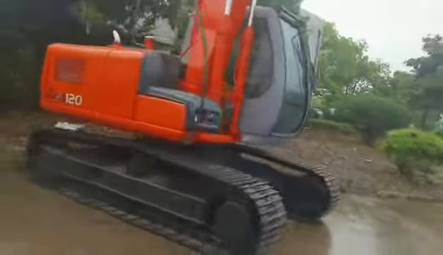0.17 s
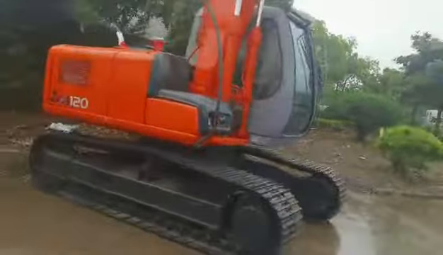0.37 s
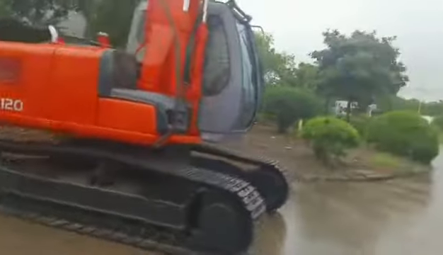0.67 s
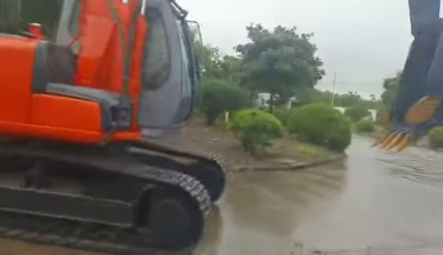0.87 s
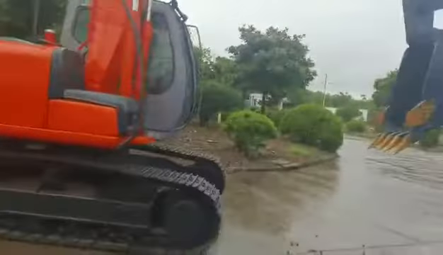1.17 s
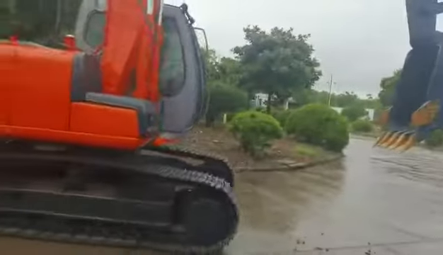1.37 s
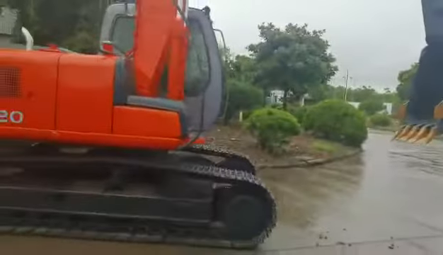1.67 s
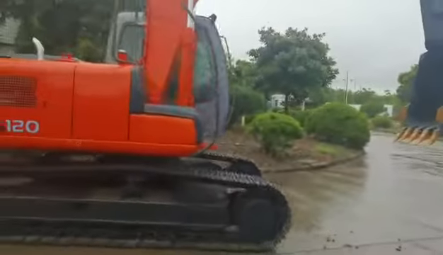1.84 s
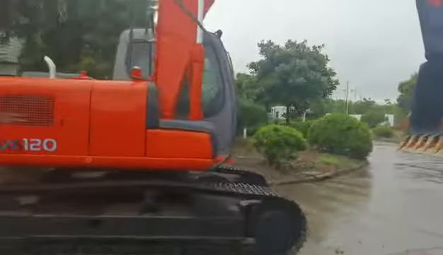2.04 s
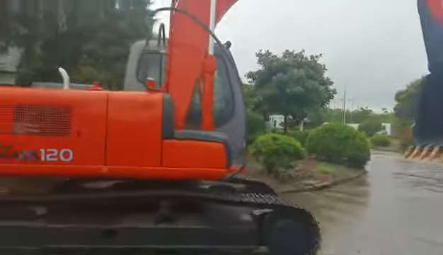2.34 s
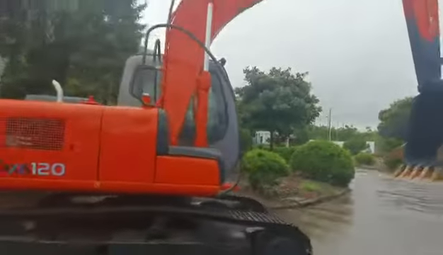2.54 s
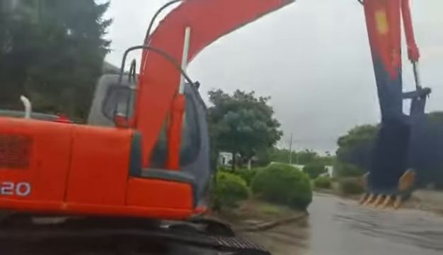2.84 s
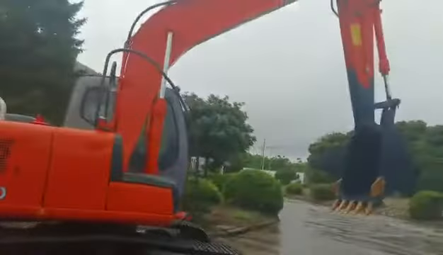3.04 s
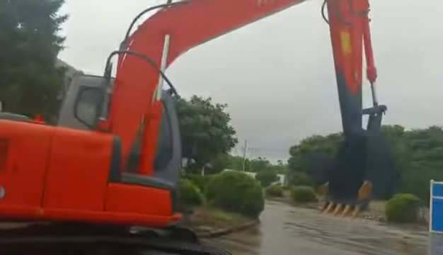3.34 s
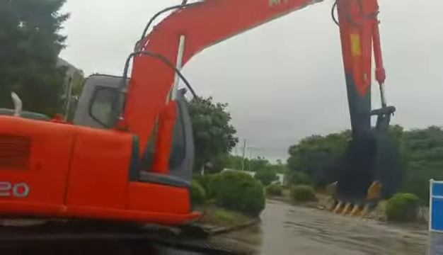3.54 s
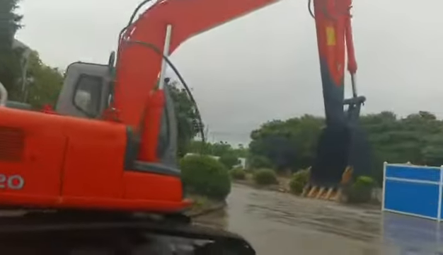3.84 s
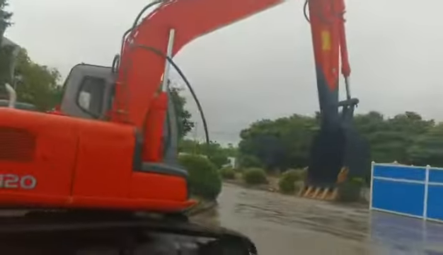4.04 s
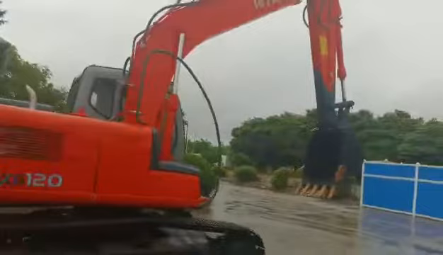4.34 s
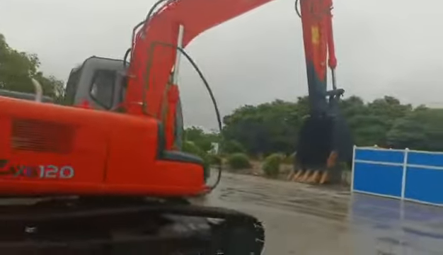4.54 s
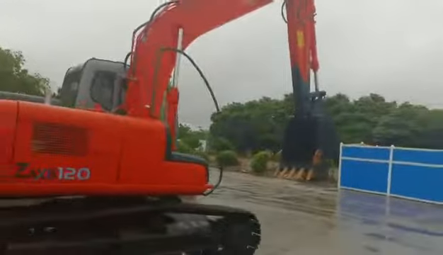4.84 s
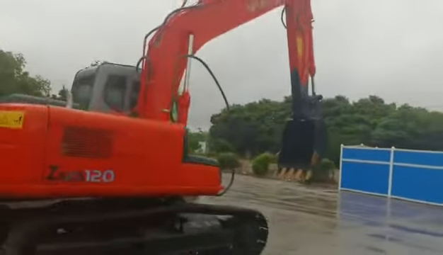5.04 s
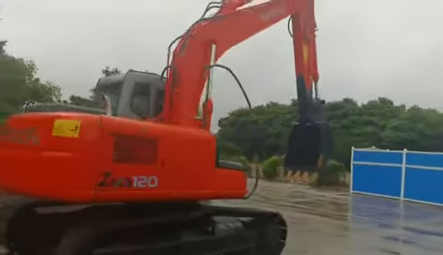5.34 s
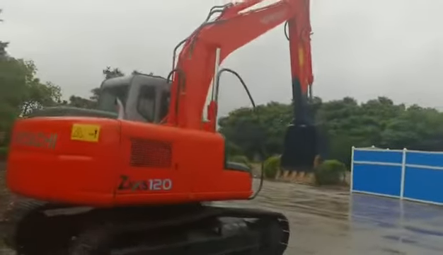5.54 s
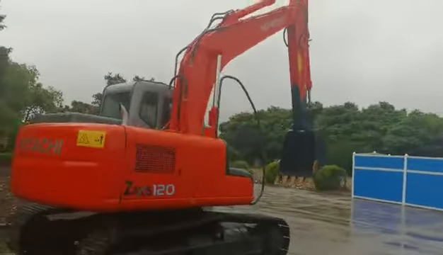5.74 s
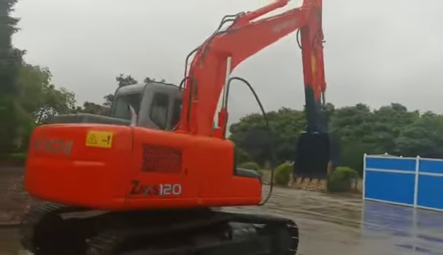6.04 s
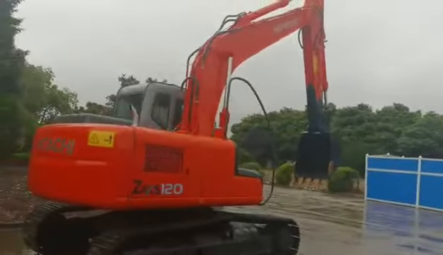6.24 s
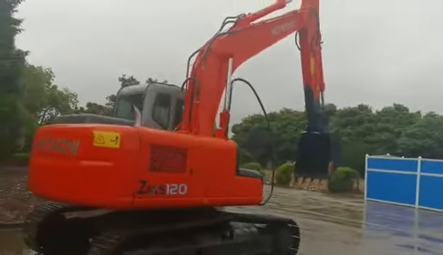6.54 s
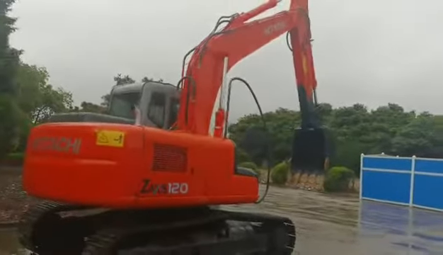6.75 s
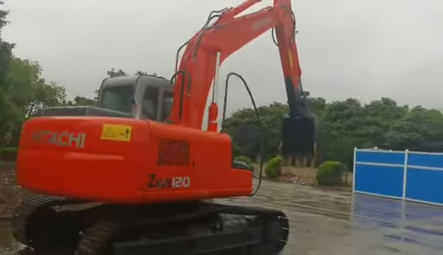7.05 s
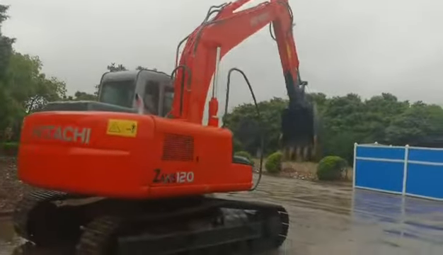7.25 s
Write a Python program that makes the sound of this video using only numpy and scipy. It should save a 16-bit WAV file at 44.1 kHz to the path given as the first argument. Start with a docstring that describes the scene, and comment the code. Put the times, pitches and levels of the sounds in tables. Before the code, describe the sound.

Heavy track shoes thump and rattle past a rumbling engine while feet slap through puddles; the clanking ends and a faint hydraulic whine rises.

```python
"""A tracked excavator crawls across a wet yard and stops: unsteady exhaust tones over shaped noise.
Decaying tones and resonant noise make its track shoes clank; hydraulics hum and whine, then oil rushes.
Crackling noise makes light rain and, near the microphone, the spray after feet slap through thin puddles.
Rain and spray are brightest between about 8 and 9 kHz; the level of the far sound dips briefly at set moments."""
import sys
import numpy as np
from scipy import signal
from scipy.fft import rfft, irfft, next_fast_len
from scipy.io import wavfile
from scipy.ndimage import uniform_filter1d, map_coordinates

SR = 44100
rng = np.random.default_rng(int(sys.argv[2]) if len(sys.argv) > 2 else 0)


def unload_wav(signal):
    """Save mono or channel-first audio to the path in sys.argv[1] as 16-bit WAV at rate SR, clipped to [-1, 1]."""
    wavfile.write(
        sys.argv[1],
        SR,
        np.round(np.clip(np.atleast_2d(signal).T, -1, 1) * 32767).astype(np.int16),
    )


N = 326781
TIME = np.arange(N) / SR
STOP_S, LIFT_S = 5.45, 6.3  # the tracks stop; the boom starts to lift


def amp(db):
    """Amplitude factor of a level in dB."""
    return 10 ** (np.asarray(db) / 20)


def unit(x):
    """x scaled to rms 1."""
    return x / np.sqrt(np.mean(x ** 2) + 1e-20)


def along(points, hz):
    """Read (Hz, value) points on a log frequency axis."""
    f, v = np.transpose(points)
    return np.interp(np.log(hz + 1), np.log(f + 1), v)


def curves(rows):
    """One value per sample for each column after the time."""
    s, *cols = np.transpose(rows)
    return [np.interp(TIME, s, c) for c in cols]


def after(s, rise_s):
    """A ramp from 0 at a moment to 1 once the rise is over."""
    return np.clip((TIME - s) / rise_s, 0, 1)


def wobble(rate):
    """A smooth random curve, rate knots a second."""
    return map_coordinates(rng.standard_normal(int(N * rate / SR) + 4), [TIME * rate])


def filtered(x, response):
    """x times a complex response of frequency."""
    m = next_fast_len(N + SR // 2)
    return irfft(rfft(x, m) * response(np.fft.rfftfreq(m, 1 / SR)), m)[..., :N]


def resonances(modes):
    """Causal response of (Hz, width in Hz, dB) resonances, with alternating signs."""
    def response(f):
        return sum((-1) ** k * amp(db) * 1j * f * w / (c * c - f * f + 1j * f * w)
                   for k, (c, w, db) in enumerate(modes))
    return response


def causal(spectrum):
    """Minimum-phase response of a spectrum, so that nothing sounds before a blow."""
    def response(hz):
        cepstrum = irfft(np.log(amp(np.maximum(along(spectrum, hz), -70))))
        half = len(cepstrum) // 2
        cepstrum[1:half] *= 2
        cepstrum[half + 1:] = 0
        return np.exp(rfft(cepstrum))
    return response


# Stereo width of the noises. Each row: pitch [Hz], likeness of left and right [1 = identical].
PORT_LIKENESS = [(60, 0.89), (300, 1), (600, 0.71), (1200, 0.74), (2500, 0.022), (8000, 0.12)]


def rush(spectrum, pair):
    """Two unrelated excitations, coloured and mixed to the likeness of the two ports; rms 1."""
    def mix(hz):
        turn = np.arccos(np.clip(along(PORT_LIKENESS, hz), -1, 1)) / 2
        return amp(along(spectrum, hz)) * [np.cos(turn), np.sin(turn)]
    mid, side = filtered(pair, mix)
    return unit(np.array([mid + side, mid - side]))


def patchy(patchy_db):
    """Two noises with shared streaks of random gain, narrow in pitch and long in time."""
    z = signal.stft(rng.standard_normal((2, N)), nperseg=1024)[2]
    field = uniform_filter1d(rng.standard_normal(z.shape[1:]), size=2, axis=0)
    field = uniform_filter1d(field, size=14, axis=1)
    return signal.istft(z * amp(patchy_db * unit(field)), nperseg=1024)[1][:, :N]


def crackle(rate, spread_db):
    """Two noises whose loudness comes in short random spikes, rate of them a second."""
    sizes = np.minimum(rng.exponential(size=N), 3.5)
    spikes = (rng.random(N) < rate / SR) * amp(spread_db * sizes)
    bursts = signal.lfilter([1], [1, -np.exp(-1 / (0.00061 * SR))], spikes)  # 0.61 ms decay
    return bursts * rng.standard_normal((2, N))


# Exhaust note swelling and easing. Each row: time [s], level [dB].
NOTE_SWELL = [(0.0, -37.5), (1.22, -40), (1.32, -29), (1.67, -40), (2.54, -34), (3.98, -35.5),
              (4.15, -27.5), (4.23, -35), (5.49, -46.5), (5.57, -76), (5.8, -33), (6.67, -44), (6.71, -33),
              (7.0, -34.5), (7.04, -55), (7.41, -36)]
# Colour of the pipe rumble. Each row: pitch [Hz], relative level [dB per Hz].
PIPE_COLOUR = [(25, -69), (38, -43), (70, -14), (82, -32), (101, -4), (177, -23), (200, -21), (260, -64),
               (440, -120)]
# Tones beside the note. Each row: multiple of the firing rate, level against the note [dB].
FIRING_ORDERS = [(1, -20), (3, -15.5), (4, -17.5), (6, -17)]
PIPE_DB, PIPE_WITH_NOTE = -40, 0.17  # pipe rumble; dB it moves per dB of note
NEAR_DB, LEAVE_S, LEAVING_S = 4.5, 0.31, 0.7  # the rumble is fuller while close, then thins out


def exhaust(firing):
    """The pipe sings at twice the firing rate, with weaker firing orders and a noisy rumble."""
    note_db, = curves(NOTE_SWELL)
    note = np.sqrt(2) * amp(note_db) * (1 + 0.33 * wobble(14)) * np.sin(2 * firing)
    steadier_db = uniform_filter1d(note_db, size=SR // 3)
    for multiple, db in FIRING_ORDERS:
        order_db = steadier_db + db + 3.5 * wobble(9.3)
        note += np.sqrt(2) * amp(order_db) * np.sin(multiple * firing)
    pipe_db = PIPE_DB + PIPE_WITH_NOTE * (note_db - note_db.mean())
    pipe_db += NEAR_DB * (1 - after(LEAVE_S, LEAVING_S))
    pipe = amp(pipe_db) * rush(PIPE_COLOUR, rng.standard_normal((2, N)))
    return (note + pipe) * amp([[-.9], [.9]])  # a little to the right


# The machine moving off and stopping. Each row: time [s], block clatter [dB], frame rumble [dB].
MACHINE_LEVELS = [(0.0, -33.5, -25.5), (0.47, -37, -23.5), (0.68, -40, -30.5), (1.46, -36, -28),
                  (1.9, -44, -31.5), (2.23, -46, -36.5), (3.59, -41.5, -32.5), (5.06, -41, -36.5),
                  (5.71, -48, -40), (6.62, -44, -39), (6.97, -42, -35.5), (7.41, -40.5, -40)]
# Colour of the rumbling track frame. Each row: pitch [Hz], relative level [dB per Hz].
TRACK_COLOUR = [(88, -22.5), (150, -9), (270, -5.5), (323, -2.5), (383, -12), (430, -13), (530, -29.5),
                (696, -45), (839, -22.5), (1150, -26.5), (1500, -53), (2530, -120)]
# Colour of the engine block. Each row: pitch [Hz], relative level [dB per Hz].
BLOCK_COLOUR = [(290, -46), (500, 3), (649, -0.5), (1090, -17.5), (1430, -4.5), (1600, -8), (5000, -12.5),
                (6500, -37), (11000, -120)]
# Engine casing resonances. Each row: pitch [Hz], width [Hz], level [dB].
CASING_MODES = [(695, 22, 7), (1030, 70, 7), (1450, 33, -1), (1650, 50, -18), (2280, 380, 2)]
# Upper edge of the rumble, heard only from close by. Each row: pitch [Hz], relative level [dB per Hz].
CLOSE_COLOUR = [(330, -40), (420, 1.5), (490, -1), (560, -51)]
CLOSE_DB, CLOSE_FADES_DB = -29.5, 17  # its level at first, loss per second


def block_and_frame(firing):
    """Noise in block and track frame swells slightly with each firing; a close rumble soon fades."""
    block_db, track_db = curves(MACHINE_LEVELS)
    beat = 1 + 0.043 * np.cos(firing + .5 * wobble(8.2))
    judder_db = wobble(9) + 2.5 * wobble(38)  # short lumps
    judder_db *= 1 - 0.7 * after(STOP_S, SHIFT_S)  # calmer at rest
    tracks = amp(track_db + judder_db) * rush(TRACK_COLOUR, beat * patchy(patchy_db=1.5))
    casing = filtered(beat * patchy(patchy_db=2.3), lambda hz: 1 + np.abs(resonances(CASING_MODES)(hz)))
    block = amp(block_db + 1.48 * wobble(10)) * rush(BLOCK_COLOUR, casing)
    close_db = CLOSE_DB - CLOSE_FADES_DB * TIME + judder_db
    close = amp(close_db) * rush(CLOSE_COLOUR, patchy(patchy_db=2.5))
    return tracks + close + block


LOADED_HZ, FREE_HZ = 94.8, 102.8  # exhaust note under load and running free
SHIFT_S = 0.136  # time for a change of load


def engine():
    """One firing phase drives exhaust, block and frame; it runs faster off load, unsteadier after the stop."""
    free = after(STOP_S, SHIFT_S) - after(LIFT_S - SHIFT_S, SHIFT_S)
    note_hz = LOADED_HZ + (FREE_HZ - LOADED_HZ) * free
    unsteady_hz = (1.22 + 4 * after(STOP_S, SHIFT_S)) * wobble(12)
    firing = np.pi * np.cumsum(note_hz + unsteady_hz) / SR  # half the note's phase
    return exhaust(firing) + block_and_frame(firing)


# Rain and cooling fan. Each row: time [s], level [dB], left against right [dB].
HISS_LEVELS = [(0.0, -26, 3), (0.39, -25, 0), (0.74, -28.5, -1), (1.53, -26, -3), (1.69, -27.5, -4),
               (2.5, -33, -0.5), (4.58, -30.5, 0.5), (4.68, -33.5, 0.5), (6.15, -36, 1), (6.75, -30.5, 2),
               (7.41, -31.5, -0.5)]
# Colour of the hiss. Each row: pitch [Hz], relative level [dB per Hz].
RAIN_COLOUR = [(2350, -91), (4000, -24.5), (5500, -9), (6860, -1.5), (7300, -3), (8400, 8), (8820, 6.5),
               (9470, -0.5), (10300, -16), (11000, -30), (11500, -71), (13000, -120)]


def rain():
    """A fine patchy hiss with the tiny crackles of drops in it."""
    hiss_db, pan_db = curves(HISS_LEVELS)
    drops = unit(patchy(patchy_db=2.8)) + 0.6 * unit(crackle(rate=2700, spread_db=2))
    level_db = hiss_db + 1.22 * wobble(7) + np.array([pan_db / 2, -pan_db / 2])
    return amp(level_db) * rush(RAIN_COLOUR, drops)


# Track shoes dropping on the rollers. Each row: start [s], frame thump [dB], frame pitch [Hz],
# thump length [s], link rattle [dB].
SHOE_DROPS = [(0.002, -15.5, 317, 0.017, -37), (0.237, -12.5, 193, 0.023, -27),
              (0.308, -28, 344, 0.06, -24), (0.402, -18.5, 322, 0.081, -49),
              (0.473, -28, 322, 0.029, -26.5), (0.55, -9, 210, 0.018, -22.5), (0.644, -22, 204, 0.025, -34),
              (0.889, -13.5, 216, 0.016, -28), (1.006, -19, 194, 0.018, -30), (1.17, -21, 253, 0.033, -43),
              (1.222, -11, 265, 0.038, -23.5), (1.496, -16.5, 230, 0.015, -26.5),
              (1.547, -16.5, 279.3, 0.064, -29.5), (1.635, -18.5, 272, 0.013, -32),
              (1.856, -19.5, 273.7, 0.067, -32.5), (2.06, -22.5, 308, 0.023, -50),
              (2.096, -24, 266, 0.02, -49), (2.138, -18.5, 260, 0.011, -37), (2.2, -17.5, 257, 0.017, -40),
              (2.51, -18.5, 276, 0.021, -44), (2.838, -9, 280, 0.017, -26), (3.148, -15.5, 302, 0.031, -18),
              (3.475, -11.5, 299, 0.015, -24), (3.785, -15.5, 288.6, 0.022, -22),
              (4.095, -13.5, 285, 0.013, -23.5), (4.428, -23.5, 304, 0.045, -27),
              (4.553, -19.5, 291, 0.036, -26.5), (4.591, -13.5, 330, 0.007, -17.5),
              (4.768, -18.5, 286.7, 0.049, -31.5), (5.081, -19.5, 288.6, 0.039, -25)]
# Neighbours of the frame tone. Each row: share of its amplitude, pitch ratio before a random detune.
FRAME_TONES = [(0.13, 1.9), (0.048, 0.5), (0.064, 1.45)]
# The frame's dull shudder. Each row: pitch [Hz], width [Hz], relative level [dB].
HULL_MODES = [(278, 157, 7.5), (584, 830, -10.5)]
HULL_DB = -14.5  # shudder against the thump
NEXT_S, NEXT_DB, NEXT_HZ, NEXT_LENGTH_S = 0.165, -18, 312.4, 0.033  # second knock, on the next roller


def frame_thumps():
    """Each shoe shakes the hollow frame: a short cluster of close tones in a dull shudder."""
    frame, shudder, t = np.zeros(N + SR), np.zeros(N + SR), np.arange(SR // 4) / SR
    thumps = [row[:4] for row in SHOE_DROPS]
    thumps += [(s + NEXT_S, db + NEXT_DB, NEXT_HZ, NEXT_LENGTH_S) for s, db, *_ in SHOE_DROPS]
    for s, db, hz, length in thumps:
        tones = np.sin(2 * np.pi * hz * t)
        for (share, ratio), chance in zip(FRAME_TONES, rng.standard_normal(len(FRAME_TONES))):
            tones += share * np.sin(2 * np.pi * ratio * (1 + 0.0404 * chance) * hz * t)
        shape = amp(db) * np.exp(-(t / length) ** 3) * (1 - np.exp(-t / 0.002))
        frame[round(s * SR):][:len(t)] += shape * tones
        shudder[round(s * SR):][:len(t)] += shape
    hull = filtered(rng.standard_normal(N), lambda hz: resonances(HULL_MODES)(hz) / (1 + 1j * hz / 900) ** 2)
    return frame[:N] + amp(HULL_DB) * shudder[:N] * unit(hull)


# Loose link steel. Each row: pitch [Hz], width [Hz], level [dB], pitch and level before random spread.
LINK_MODES = [(720, 560, 1), (1060, 110, 4), (1600, 140, 3), (2200, 180, 7), (2600, 150, 6), (2900, 80, 7)]
RATTLE_S, RATTLE_LEAD_S = 0.016, 0.001065  # length of a rattle; the links sound just before the frame


def link_rattle():
    """A jolt of noise at each shoe rings the loose links in their own steel."""
    links, t = np.zeros((2, N + SR)), np.arange(SR // 4) / SR
    grid = np.fft.rfftfreq(len(t), 1 / SR)
    for s, *_, db in SHOE_DROPS:
        shape = 0.63 * np.exp(-t / RATTLE_S) + 0.49 * np.exp(-t / 0.0038)
        shape *= 1 - np.exp(-t / 0.0017)
        jolt = shape * (rng.standard_normal(len(t)) + 3.1 * rng.standard_normal((2, len(t))))
        chance = rng.standard_normal((len(LINK_MODES), 2))  # no two links alike
        modes = [(hz * (1 + 0.04 * c), width, level + 4.5 * d)
                 for (hz, width, level), (c, d) in zip(LINK_MODES, chance)]
        steel = resonances(modes)(grid) / (1 + 1j * grid / 3500) ** 4
        start = round((s - RATTLE_LEAD_S) * SR)
        links[:, start:][:, :len(t)] += amp(db) * irfft(rfft(jolt) * steel, len(t))
    return links[:, :N]


# Short rough tones from the steelwork. Each row: start [s], level [dB], pitch [Hz].
STEEL_PINGS = [(0.24, -28, 1730), (0.463, -26, 1255), (0.55, -20, 1050), (0.892, -28, 1030),
               (0.892, -25, 1730), (1.85, -32, 977), (2.631, -31, 1130), (3.118, -23, 3080),
               (3.113, -34, 3760), (3.148, -24.5, 1025), (3.474, -22.5, 1045), (3.786, -25, 1053),
               (4.098, -34, 770), (4.83, -36.5, 1450), (5.085, -46, 1060), (7.084, -36, 1380)]


def pings():
    """A tone and two detuned companions beat roughly within a short bell-shaped fade."""
    steel, t = np.zeros(N + SR), np.arange(SR // 4) / SR
    shape = np.exp(-(t / 0.013) ** 2) * (1 - np.exp(-t / 0.0019))
    for s, db, hz in STEEL_PINGS:
        detune = rng.normal(1, .06, 2)
        tones = np.sin(2 * np.pi * hz * t)
        tones += .5 * np.sin(2 * np.pi * hz * np.outer(detune, t)).sum(axis=0)
        steel[round(s * SR):][:len(t)] += amp(db) * tones * shape
    return steel[:N]


# Loose track pins while crawling. Each row: time [s], level [dB].
CHATTER_LEVELS = [(0, -68), (0.4, -45), (0.7, -42), (1.35, -42), (1.65, -45), (2.1, -51.5), (5.2, -55),
                  (5.5, -60)]
# Ring of the pins. Each row: pitch [Hz], width [Hz], relative level [dB].
PIN_MODES = [(770, 40, 3.5), (887, 92, -0.5)]


def chatter():
    """Many small irregular taps of the track pins, each ringing briefly."""
    level_db, = curves(CHATTER_LEVELS)
    taps = crackle(rate=67, spread_db=1.5) + 0.5 * rng.standard_normal((2, N))
    ring = filtered(taps[0] + 0.5 * taps, resonances(PIN_MODES))
    band = filtered(ring, lambda hz: 1 / (1 + (hz / 1150) ** 8 + (550 / (hz + 1)) ** 8))
    return amp(level_db) * unit(band)


def yard(x):
    """Short scattered echoes off the wet ground and hedges, much alike at both ports."""
    t = np.arange(SR // 3) / SR
    scatter = rng.standard_normal(len(t)) + .3 * rng.standard_normal((2, len(t)))
    tail = scatter * amp(-60 * t / .22)  # 60 dB down in 0.22 s
    late = np.pad(x, ((0, 0), (400, 0)))  # first echo after 400 samples
    return signal.fftconvolve(late, tail / np.linalg.norm(tail[0]), axes=1)[:, :N]


# Oil rushing in the boom lines. Each row: pitch [Hz], width [Hz], relative level [dB].
OIL_MODES = [(685, 18, 16), (1430, 40, 10), (1700, 25, 5), (2500, 44, 4)]
# Travel gear hum. Each row: time [s], level [dB].
GEAR_LEVELS = [(2.6, -63), (3.0, -40), (5.0, -45), (5.3, -71)]
GEAR_HZ, PUMP_HZ = 427, 634
PUMP_DB, PUMP_LIFT_DB, PUMP_RISE_S = -59, 12, 0.7  # whine at rest, its rise under the boom, time to rise


def hydraulics():
    """Gear hum is narrow noise; pump whine with overtones and oil noise swells when the boom lifts."""
    gear_db, = curves(GEAR_LEVELS)
    pump_db = PUMP_DB + PUMP_LIFT_DB * after(LIFT_S, PUMP_RISE_S)
    gear = unit(filtered(rng.standard_normal(N), lambda hz: resonances([(GEAR_HZ, 15, 0)])(hz) ** 2))

    def lines(hz):
        return sum(resonances([(c, w, 0)])(hz) ** 2 * amp(db) for c, w, db in OIL_MODES)
    oil = filtered(rng.standard_normal((2, N)) + rng.standard_normal(N), lines) / 8
    turn = 2 * np.pi * np.cumsum(PUMP_HZ + 2.0 * wobble(10)) / SR
    whine = np.sin(turn) + amp(-6) * np.sin(2 * turn) + amp(-12) * np.sin(3 * turn)
    hum = amp(gear_db + 2.7 * wobble(6)) * gear
    return hum + amp(pump_db + 2 * wobble(8)) * oil + amp(pump_db + 3 * wobble(14)) * whine


# Feet on the water film. Each row: start [s], slap [dB], spray [dB], time for the spray to fall 60 dB [s].
FOOT_SLAPS = [(0.087, -26, -25, 0.19), (0.1267, -15.5, -19.5, 0.21), (0.1618, -17, -20, 0.34),
              (0.206, -32, -22, 0.4), (0.238, -17, -21, 0.19), (0.539, -11.5, -23, 0.2),
              (0.548, -12, -12.5, 0.22), (0.5857, -14.5, -26, 0.3), (0.925, -15, -27, 0.27),
              (1.535, -14.5, -18, 0.17), (1.5794, -38, -20.5, 0.61), (1.6613, -13, -17.5, 0.39),
              (1.676, -20, -29, 0.32), (1.734, -26, -20, 0.52), (1.769, -17, -34, 0.27),
              (1.788, -19, -38, 0.2), (1.937, -14.5, -40, 0.096), (1.95, -23, -26, 0.79),
              (2.173, -17, -25.5, 0.68), (2.293, -17, -25, 0.2), (2.3, -15.5, -24.5, 0.49),
              (2.799, -17, -21.5, 0.69), (3.0616, -16.5, -18.5, 0.16), (3.1093, -19, -19.5, 0.3),
              (3.394, -20.5, -23, 0.27), (3.422, -19, -25, 0.96), (3.5, -16, -19.5, 0.31),
              (3.543, -15, -16, 0.22), (3.5546, -22, -19.5, 0.23), (3.6014, -13, -11.5, 0.13),
              (3.8303, -19.5, -28, 0.33), (4.028, -18.5, -26.5, 0.58), (4.2614, -33, -30, 0.65),
              (4.35, -19, -25.5, 0.29), (4.371, -20, -11.5, 0.21), (4.3865, -20.5, -45, .24),
              (4.4132, -18, -17, 0.2), (4.422, -23, -22, 0.53), (4.548, -24, -29, 0.41),
              (4.6276, -22, -24.5, 0.94), (4.6683, -13, -18.5, 0.24), (4.986, -29, -27, 0.097),
              (5.202, -29, -25, 0.51), (5.2275, -15.5, -16.5, 0.11)]
# Colour of slaps and spray. Each row: pitch [Hz], relative level [dB per Hz].
WATER_COLOUR = [(1470, -23.5), (2500, -13.5), (2810, -13.5), (3980, -16), (5360, -9.5), (7750, 2),
                (8590, 9.5), (9140, 10), (10700, -1.5), (11800, -8), (15200, -16.5), (16400, -93)]
TOP_FADE_DB = 2.4  # spray above 10.8 kHz loses (fading / this) squared more


def steps():
    """Sharp slaps on the water film, each with a crackling spray; the spray above 10.8 kHz fades sooner."""
    blows, t = np.zeros((2, N + SR)), np.arange(SR // 2) / SR
    spray_power = np.zeros((2, N + SR))  # rows: lower spray, top spray
    snap = amp(-60 * t / 0.012)
    for s, db, spray_db, t60 in FOOT_SLAPS:
        start = round(s * SR)
        shared, own = rng.standard_normal(len(t)), rng.standard_normal((2, len(t)))
        blows[:, start:][:, :len(t)] += amp(db) * snap * (shared + own + 6 * (t == 0))
        fading = 60 * t / max(t60, .03)
        level = amp(spray_db - np.array([fading, fading + (fading / TOP_FADE_DB) ** 2]))
        spray_power[:, start:][:, :len(t)] += level ** 2 * (1 - np.exp(-t / 0.0031)) ** 2
    colour = causal(WATER_COLOUR)
    loudness = np.std(filtered(rng.standard_normal(N), colour))
    clumps = amp(1.5 * wobble(45) + 3 * wobble(170))
    grains = unit(crackle(rate=900, spread_db=1.6)) + 1.5 * rng.standard_normal((2, N))
    spray = rush(WATER_COLOUR, clumps * grains)
    top_spray = filtered(spray, lambda hz: hz > 10800)
    lower_level, top_level = np.sqrt(spray_power[:, :N])
    slaps = filtered(blows[:, :N], colour) / loudness
    water = slaps + lower_level * (spray - top_spray) + top_level * top_spray
    return water * amp([[1.2], [-1.2]])  # a little to the left


# Brief dips of the far sound. Each row: start [s], depth before smoothing [dB], length [s].
FAR_DIPS = [(0.131, 6, 0.038), (0.165, 20.5, 0.074), (0.554, 13.5, 0.07), (1.671, 14, 0.051),
            (1.936, 8, 0.065), (2.29, 7.5, 0.057), (2.798, 6.5, 0.095), (4.39, 11, 0.04),
            (4.633, 10.5, 0.037)]


def dips():
    """Gain on the far sound: a sudden fall, a short hold, a quick return."""
    fall_db = sum(db * (TIME > s) * np.exp(-np.abs((TIME - s) / length) ** 3) for s, db, length in FAR_DIPS)
    return amp(-uniform_filter1d(fall_db, size=120))


LEAD_S = 0.0001917  # the left port hears the scene first


def scene():
    """Machine, rain and yard echoes share the dips; the near steps stay untouched."""
    knocks = frame_thumps() + link_rattle() + pings() + chatter()
    far = engine() + rain() + knocks + amp(-7) * yard(knocks) + hydraulics()
    field = dips() * far + steps()
    return filtered(field, lambda hz: np.exp(1j * np.pi * hz * LEAD_S * np.array([[1], [-1]])))


TOP_HZ = 16500  # band limit


def record(dry):
    """Peaks round off at full scale; the microphone drops the deepest bass, and the band limit cuts the top."""
    rounded = dry / (1 + np.abs(dry) ** 6) ** (1 / 6)
    return filtered(rounded, lambda hz: (hz < TOP_HZ) * 1j * hz / (45 + 1j * hz))


dry = scene()
out = record(dry)
unload_wav(out)
```